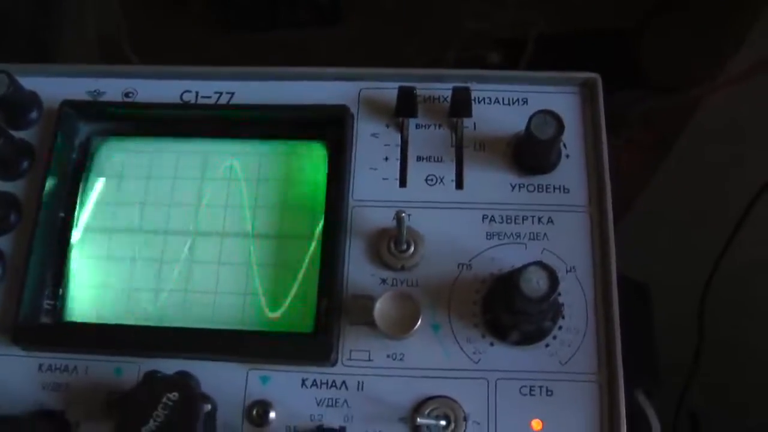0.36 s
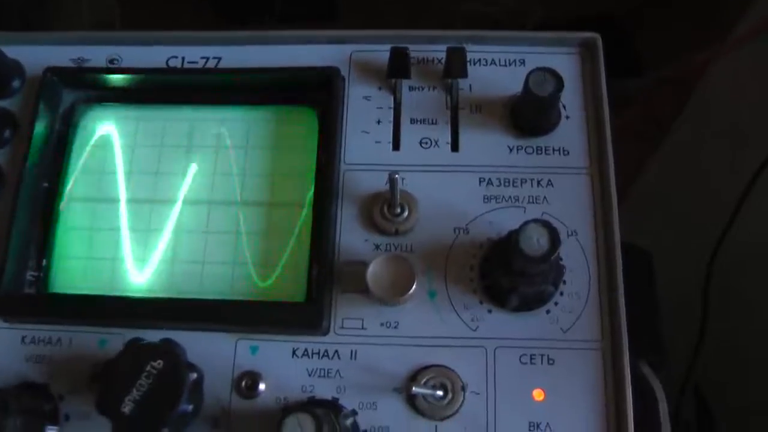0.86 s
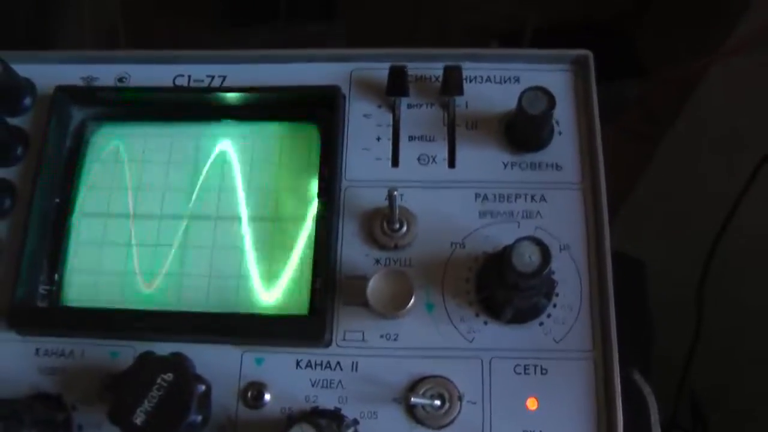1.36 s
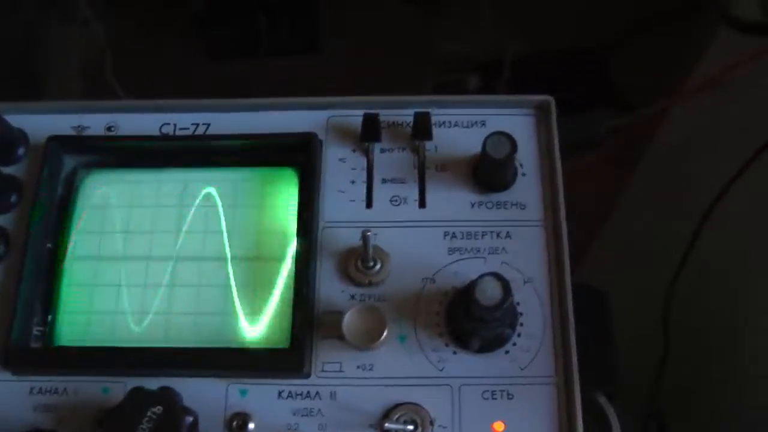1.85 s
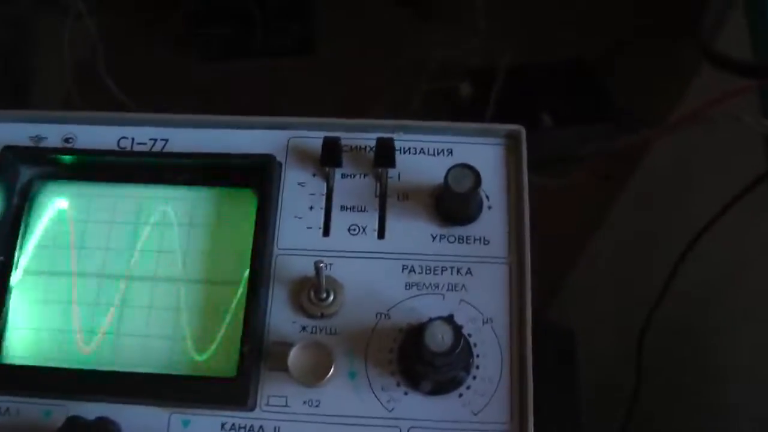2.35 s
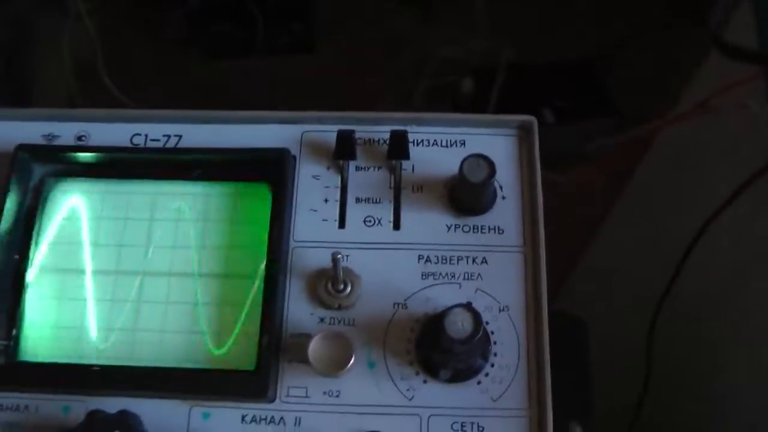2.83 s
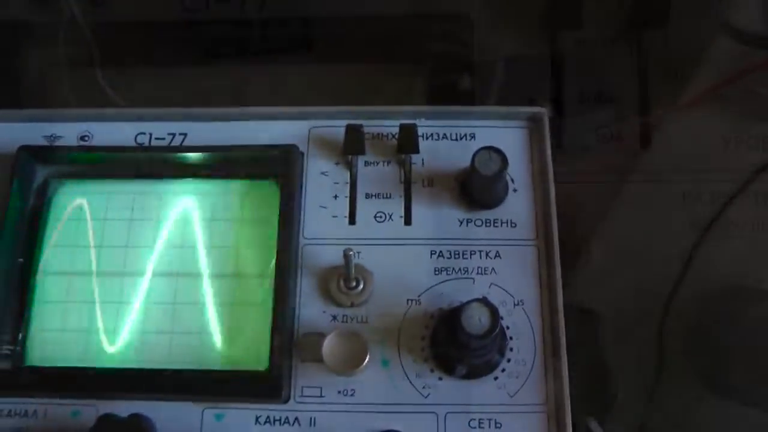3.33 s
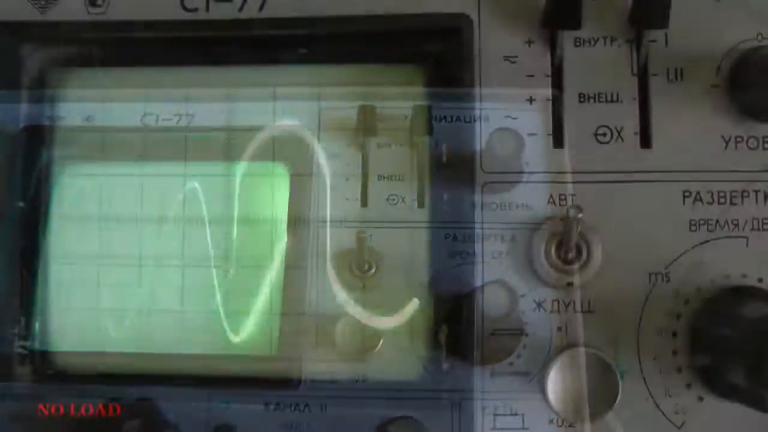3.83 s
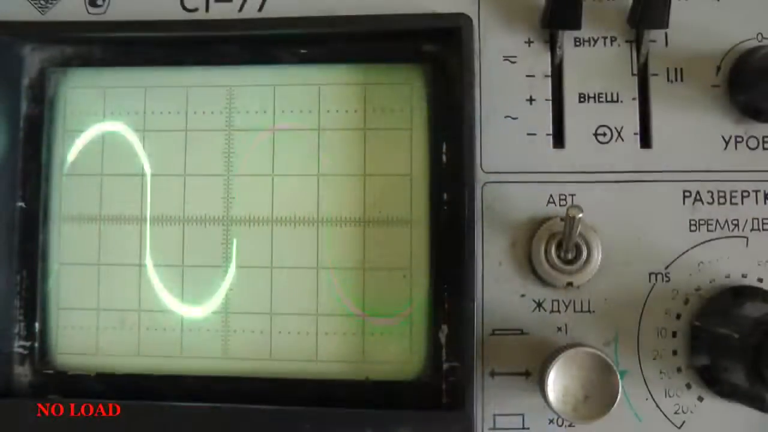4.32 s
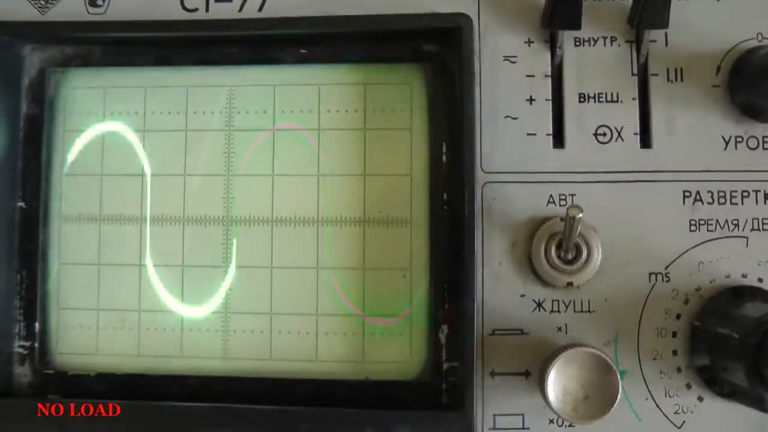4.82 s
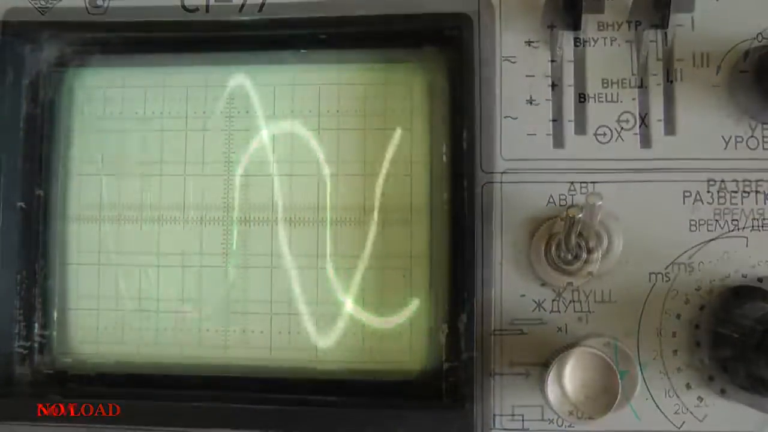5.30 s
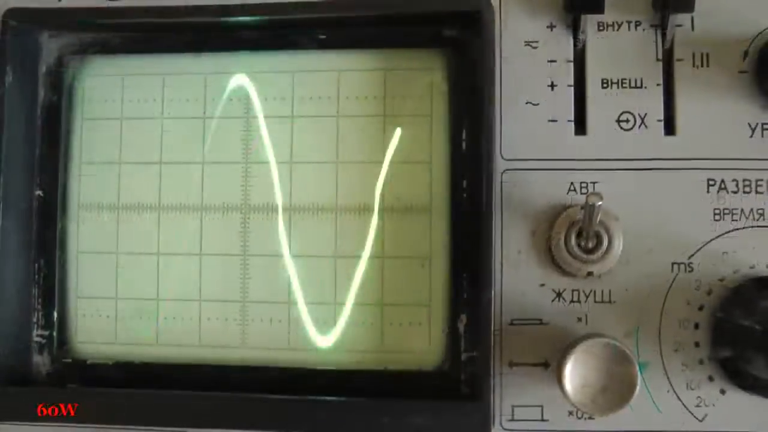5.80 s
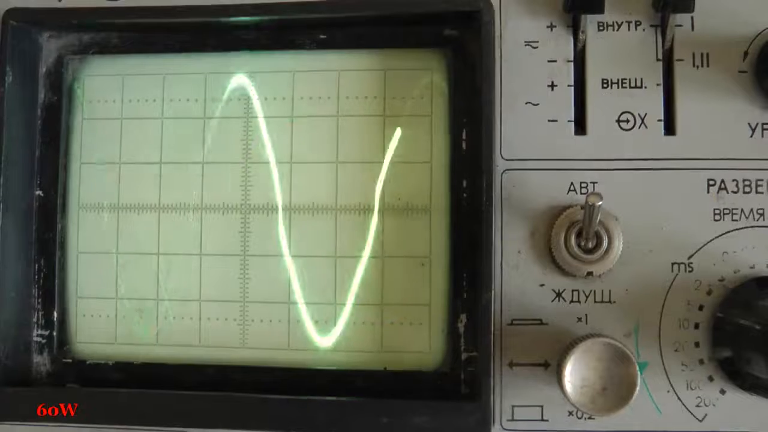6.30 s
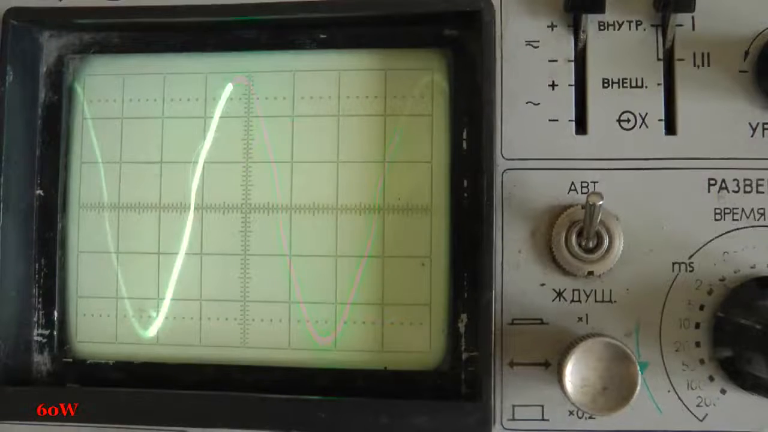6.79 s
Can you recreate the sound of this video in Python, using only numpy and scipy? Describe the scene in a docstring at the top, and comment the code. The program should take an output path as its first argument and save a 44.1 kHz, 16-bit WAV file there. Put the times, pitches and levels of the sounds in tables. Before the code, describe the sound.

From 0 seconds an electric drill motor is already whirring fast and close, a bright, rough brush hiss with bearing whines and a piercing commutator tone. With no power driving it, the pitch slides down continuously, the tones sweeping through fixed metallic housing resonances. Gain control restrains the early loudness. By 3 to 4 seconds it is a thinner, lower whirr, then a gritty scrape that stops near 4.5. The workshop's low rumble, soft hiss and faint hum come up, and a thin very high electronic whine enters around 4.1 to 4.4, later dipping briefly. At 5.3 light ticks lead into a tight, sharp double-to-triple clack at 5.43 to 5.46, with short rattle and a brief weak scrape of the rotor until about 5.8. A very faint tick at 5.8 and a clearer click at 5.93 follow. Room tone continues, with a tiny high ping just before 7.

```python
"""An electric drill whirrs down to a stop in a workshop; later a switch clacks and ticks, then a faint ping.
The motor is hiss, bearing combs, commutator whine and rotor orders gliding through fixed housing resonances.
Each switch click is a crack ringing in that housing, with a rattle that dies away in the shop.
Around it lie rumble and hiss, transformer hum, a faint tone and, late on, a thin electronic whine.
Two microphone ports hear it; gain control holds the motor down, so the room swells as the motor fades."""
import sys
import numpy as np
from scipy import signal
from scipy.fft import rfft, irfft
from scipy.io import wavfile
from scipy.ndimage import uniform_filter1d

SR = 44100
rng = np.random.default_rng(int(sys.argv[2]) if len(sys.argv) > 2 else 0)


def ratio(d):
    """dB to gain"""
    e = np.asarray(d, float) / 20
    return 10 ** e


def log_audio(samples):
    """Write samples as a 16-bit WAV file to the path given in sys.argv[1]."""
    # one column per channel
    frames = np.atleast_2d(samples).T
    # limit to full scale, then quantise
    limited = np.clip(frames, -1, 1)
    pcm = np.round(limited * 32767).astype(np.int16)
    wavfile.write(sys.argv[1], SR, pcm)


N = 315844
T = np.arange(N) / SR  # time [s]
HZ = np.fft.rfftfreq(1024, 1 / SR)  # bins of the port spectra [Hz]

# rotor: it stops at STOP_S [s]; running free it loses RUB - EASE * speed + FAN * speed ** 2
# turns per s every second: brush friction, its easing with speed, fan drag
STOP_S = 4.5
RUB, EASE, FAN = 77.136, .05495, 6.6308e-4
# the clack swings the rotor again: start [s], speed [turns/s], length [s]
JOLT_S, JOLT_SPEED, JOLT_LENGTH_S = 5.44, 18.1, 0.37

BALL_PASS = 3.495  # balls passing a race flaw per rotor turn
# bearing combs, one tooth every ball pass, and two single commutator whines near orders 24 and 48;
# each sounds at order tooth * BALL_PASS + shift:
# (shift [rotor orders], first tooth [count], last tooth [count])
MOTOR_LINES = [(0, 8, 22), (1.95, 4, 15), (1.88, 2, 6), (1.92, 1, 2), (2.0, 6, 9), (.23, 4, 9), (.8, 6, 12),
               (3.03, 6, 6), (.8, 9, 22), (.8, 13, 22), (2.4, 13, 13), (0, 14, 14), (0, 7, 7)]
# where each row of lines sounds through the housing: (level against the hiss [dB], loss per tooth [dB],
# centre [Hz], spread upward [octaves], spread downward [octaves])
LINE_VOICING = [(-10.5, .45, 6800, .07, .35), (-12.5, .2, 3200, .13, .2), (-14, -1, 1290, .13, .13),
                (-20, .5, 700, .12, .15), (-15, .1, 5500, .2, .2), (-18, .3, 3500, .2, .25),
                (-16, .1, 6800, .15, .2), (-15, .1, 5500, .2, .25), (-11, .2, 13700, .05, .06),
                (-12, .2, 10500, .08, .1), (-9.5, 0, 5600, .4, .45), (-11, 0, 5500, .35, .45),
                (-9, 0, 7000, .05, .42)]

# relative colour of the whirr, from full speed down to a crawl: (frequency [Hz], level [dB])
FAST_COLOUR = [(18, -55), (30, -31), (81, -18.5), (308, -14.5), (379, -16.5), (468, -14.5), (711, -10),
               (948, -10), (1440, -2), (2630, -6), (3890, 0), (13700, -14.5), (15600, -12)]
MIDDLING_COLOUR = [(18, -91), (30, -69), (69, -25), (208, -18), (292, -16), (730, -4.5), (876, -9.5),
                   (1440, -9), (2250, -13.5), (3080, -7.5), (6230, -8), (13700, -13), (15600, -16)]
SLOW_COLOUR = [(240, -24), (400, -23.5), (727, -23), (1120, -24), (1300, -21.5), (2190, -15), (3120, -5),
               (3690, -12), (6910, -11.5), (8180, -19), (13800, -23), (15600, -29)]
CRAWL_COLOUR = [(290, -39), (500, -18), (629, -33), (727, -0.5), (955, -11.5), (1350, -3.5), (2170, -12),
                (3200, -1.5), (3690, -11), (9970, -27.5), (15600, -39)]
# rotor speeds of the four colours, crawl first: (speed [turns/s])
COLOUR_SPEEDS = [20, 65, 210, 390]
# resonances of the drill housing: (frequency [Hz], width [Hz], lift [dB])
HOUSING_RESONANCES = [(397, 12, 10), (586.5, 35, 11), (738, 23.6, 11), (1086.6, 23.5, 10), (1257, 54, 4),
                      (1398, 40, 11), (1640, 15, -0.5), (1850, 90, 4.5), (2736, 59, 2), (2843, 24, 7),
                      (3050, 29, 8), (3169, 54, 7.5), (3570, 26, 4.5), (3963, 51, 7.5), (4600, 24, 3.5),
                      (4250, 27, 5), (4810, 53, 3.5), (6030, 86, 4.5), (6890, 86, 4.5), (10770, 1600, 3.5),
                      (13600, 400, 8.5)]
# near the stop the brush hiss outlasts the scrape: up to this many dB per octave above this pitch
LINGER_DB, LINGER_HZ = 13, 3500

# fan and brush roar: level [dB] at FULL_SPEED [turns/s], and loss [dB] for each tenfold drop in speed
FULL_SPEED, ROAR_DB, ROAR_DB_PER_DECADE = 457, -0.1, 49.5
# gear scrape about SCRAPE_SPEED [turns/s], with its fall above and below [dB per tenfold]
SCRAPE_DB, SCRAPE_SPEED, SCRAPE_FAST_DB, SCRAPE_SLOW_DB = -23, 47.5, 6, 37.5
# rotor unbalance as the bench sounds it: (frequency [Hz], rms level [dB])
BENCH_RESPONSE = [(20, -81), (70, -58), (130, -50.5), (220, -36), (275, -29), (350, -28), (415, -16.5),
                  (460, -21.5), (550, -7.5), (700, -2.5), (920, -7.5)]
SECOND_ORDER_DB = -19  # second order against the first at the same pitch

# two microphone ports, toward the drill and for the room: a pair of lists,
# (frequency [Hz], likeness of the ports [-1..1]) and (frequency [Hz], left over right [dB])
DRILL_PORTS = [(60, -3), (130, -0.4), (290, 0.9), (640, 0.85), (1410, 0.43), (3100, 0.5), (6820, 0.84),
               (15000, -0.6)], [(60, -11.5), (180, 5.5), (550, 1.5), (1650, 3.0), (4970, 5.5), (15000, -2)]
ROOM_PORTS = [(60, 0.85), (180, 0.97), (550, 0.93), (1650, 0.49), (4970, 0.85), (15000, 0.49)], [(60, -1),
              (380, -0.5), (2380, -1.5), (15000, 1)]

# relative colour of the room's rumble and hiss: (frequency [Hz], level [dB])
ROOM_COLOUR = [(15, -83), (25, -29), (57, -15), (86, -25), (108, -8), (227, 2.5), (359, -6), (483, -13.5),
               (568, -10), (900, -23), (1310, -25), (1760, -21.5), (6760, -36.5), (9090, -37.5),
               (9850, -34), (10700, -39), (15600, -38)]
ROOM_DB = -49  # rms of rumble and hiss
# transformer hum: (frequency [Hz], rms level [dB])
MAINS_HUM = (100, -60.5)
# faint steady tone: (frequency [Hz], rms level [dB])
FAINT_TONE = (840, -75)
# thin electronic whine: pitch, rms level between dips, and when and how fast it comes in
WHINE_HZ, WHINE_DB, WHINE_ON_S, WHINE_RISE_S = 9685, -59.5, 4.1, .3
# brief dips of the whine: (time [s], depth [dB], half-width [s])
WHINE_DIPS = [(5.23, 4, .15), (5.66, 10, 0.14), (6.09, 0.5, 0.13), (6.34, 9, .03), (6.68, 7, .025),
              (6.98, 14, .025)]

# switch clicks: (time [s], level [dB], ring t60 [s], rattle against the crack [dB], contact ring [Hz])
SWITCH_CLICKS = [(5.3166, -39.5, 0.037, -15, 1950), (5.3986, -50, 0.04, -3.5, 2540),
                 (5.4181, -42.5, 0.031, 4, 4300), (5.4338, -21.5, 0.016, -18, 2850),
                 (5.4444, -22, 0.054, -15, 4550), (5.4555, -26, 0.046, -13, 2500),
                 (5.79, -59.5, 0.044, 4.5, 2400), (5.9297, -34, 0.024, -17.5, 2100)]
# relative colour of a click: (frequency [Hz], level [dB])
CLICK_COLOUR = [(180, -61), (300, -37), (404, 6.5), (535, -15), (720, 11), (1000, -14), (3080, -0.5),
                (9330, -7.5), (14100, -13), (15600, -28)]
# how long the shop holds a rattle: (frequency [Hz], t60 [s])
SHOP_DECAY = [(400, 1.3), (750, 0.74), (1500, 0.71), (3000, 0.46), (6000, 0.69), (12000, 0.62)]
CLICK_PAN_DB = 2  # left over right
LIGHT_TILT_DB, HEAVY_TILT_DB = -3, 2.3  # treble tilt per octave: light ticks are duller

# faint small ping: (time [s], frequency [Hz], level before its soft onset [dB], t60 [s])
SMALL_PING = (6.985, 4380, -58, .2)


def evened(x):
    """Scales to rms 1."""
    return x / np.sqrt(np.mean(x ** 2) + 1e-20)


def read(points, hz):
    """Reads a spectrum on a log-frequency axis."""
    f, value = np.transpose(points)
    return np.interp(np.log(hz + 1), np.log(f + 1), value)


def drift(rate_hz, count):
    """Random curves of about rms 1, straight between rate_hz knots a second."""
    knots = rng.standard_normal((count, int(N / SR * 60) + 2))
    place = T * np.clip(rate_hz, .1, 59)
    curves = np.array([np.interp(place, np.arange(len(k)), k) for k in knots])
    return curves * 1.2  # makes up what the straight lines lose


def housing_db(hz):
    """Bell-shaped lifts at the fixed resonances of the housing."""
    return sum(db / (1 + (2 * (hz - f) / width) ** 2) for f, width, db in HOUSING_RESONANCES)


def ports(direct, stray, gain, pair):
    """Colours a sound by gain (bins x frames) and spreads it over two ports that share part of it."""
    like, lean_db = (read(points, HZ)[:, None] for points in pair)
    like = np.clip(like, -1, 1)
    shared, own = (signal.stft(x, nperseg=1024, noverlap=768)[2] * gain for x in (direct, stray))
    left = shared * ratio(lean_db / 2)
    right = (like * shared + np.sqrt(1 - like ** 2) * own) / ratio(lean_db / 2)
    return signal.istft(np.array([left, right]), nperseg=1024, noverlap=768)[1][:, :N]


def rotor_speed():
    """Turns per second: the drag law solved backwards from the stop, then a short swing that holds and dies."""
    root = np.sqrt(4 * RUB * FAN - EASE ** 2)
    phase = root / 2 * (STOP_S - T) - np.arctan(EASE / root)
    coast = np.maximum(root * np.tan(phase) + EASE, 0) / (2 * FAN)
    swing = JOLT_SPEED * np.maximum(1 - ((T - JOLT_S) / JOLT_LENGTH_S) ** 2, 0)
    return coast + (T > JOLT_S) * swing


def bearing_and_commutator(speed, angle):
    """Comb teeth and commutator whines sing as they glide through their bands; a quarter-turn twin is port 2's."""
    lines = np.zeros(N, complex)
    # balls slip a little, blurring the high teeth; the whines share this blur
    angle = angle + .036 * drift(rate_hz=55.0, count=1)[0]
    for (shift, first, last), (db, loss_db, centre_hz, up, down) in zip(MOTOR_LINES, LINE_VOICING):
        waver = drift(rate_hz=25.0, count=3)
        for k in range(first, last + 1):
            order = k * BALL_PASS + shift
            on = abs(np.log2((order * speed + 1) / centre_hz)) < 1  # within an octave of the centre
            octaves = np.log2(order * speed[on] / centre_hz)
            bell_db = -4.3 * (octaves / np.where(octaves > 0, up, down)) ** 2
            size = ratio(db - loss_db * (k - first) + 2.5 * waver[k % 3, on] + bell_db)
            lines[on] += size * np.exp(1j * (order * angle[on] + 2 * np.pi * rng.random()))
    return np.array([lines.real, lines.imag])


def whirr_gain(speed):
    """Housing resonances stay put while the colour between them follows the rotor speed."""
    pace = np.r_[speed[::256], 0, 0][:-(-N // 256) + 1]  # one speed per spectrum frame
    shares = [np.interp(pace, COLOUR_SPEEDS, one) for one in np.eye(4)]
    colours = (CRAWL_COLOUR, SLOW_COLOUR, MIDDLING_COLOUR, FAST_COLOUR)
    colour_db = sum(read(c, HZ)[:, None] * share for c, share in zip(colours, shares))
    gain = ratio(colour_db + housing_db(HZ)[:, None])
    gain /= np.sqrt((gain ** 2).mean(0))
    octaves_above = np.log2(np.maximum(HZ / LINGER_HZ, 1))[:, None]
    nearness_to_stop = np.maximum(1 - pace / COLOUR_SPEEDS[0], 0)
    return gain * ratio(LINGER_DB * octaves_above * nearness_to_stop)


def loudness(speed):
    """Roar that sinks with speed plus the scrape that is left at a crawl."""
    fast, slow = (np.log10((speed + .5) / mark) for mark in (FULL_SPEED, SCRAPE_SPEED))
    scrape = ratio(SCRAPE_DB) / np.hypot(ratio(SCRAPE_FAST_DB * slow), ratio(-SCRAPE_SLOW_DB * slow))
    return np.hypot(ratio(ROAR_DB + ROAR_DB_PER_DECADE * fast), scrape)


def motor():
    """Brush and fan hiss, bearing combs and commutator whine drive the housing; low rotor orders are sines."""
    speed = rotor_speed()
    angle = 2 * np.pi * np.cumsum(speed) / SR
    # the hiss throbs with each turn and each ball, and flutters at random
    throb = 1 + 0.069 * np.cos(angle) + 0.15 * np.cos(BALL_PASS * angle)
    flutter = ratio(0.53 * drift(rate_hz=40.0, count=1))
    hiss = rng.standard_normal((2, N)) * throb * flutter
    direct, stray = hiss + bearing_and_commutator(speed, angle)
    whirr = ports(direct, stray, whirr_gain(speed), DRILL_PORTS) * loudness(speed)
    shake = drift(rate_hz=30.0, count=2)
    for k, db in enumerate((0, SECOND_ORDER_DB)):
        hz = (k + 1) * speed
        # the likeness of the ports at this pitch sets how far out of step they hear it
        lag = np.arccos(np.clip(read(DRILL_PORTS[0], hz), -1, 1)) * np.array([[.5], [-.5]])
        size = ratio(read(BENCH_RESPONSE, hz) + db + 3 + 3.0 * shake[k])  # the plain 3 dB: rms to peak
        whirr += size * np.cos((k + 1) * angle + lag)
    return whirr


def room():
    """Shaped noise gives low rumble and hiss; steady sines give mains hum, a thin whine and a faint tone."""
    swell = ratio(0.32 * drift(rate_hz=4.7, count=1))
    noise = rng.standard_normal((2, N)) * swell
    air = ports(*noise, ratio(read(ROOM_COLOUR, HZ))[:, None], ROOM_PORTS)
    hum_hz, hum_db = MAINS_HUM
    hum = ratio(hum_db + 1.1 * drift(rate_hz=5.0, count=1)) * np.cos(2 * np.pi * hum_hz * T)
    dips_db = sum(db * np.exp(-((T - s) / width) ** 2) for s, db, width in WHINE_DIPS)
    rise = np.clip((T - WHINE_ON_S) / WHINE_RISE_S, 0, 1)
    port_lag = np.array([[0], [1.2]])  # radians
    whine = ratio(WHINE_DB - dips_db) * rise * np.cos(2 * np.pi * WHINE_HZ * T - port_lag)
    tone_hz, tone_db = FAINT_TONE
    tone = ratio(tone_db) * np.cos(2 * np.pi * tone_hz * T)
    return ratio(ROOM_DB) * evened(air) + np.sqrt(2) * (hum + whine + tone)  # root 2: rms to peak


def causal(colour_db):
    """Minimum-phase filter response of rms 1 that rings after the blow, never before."""
    whole = np.log(ratio(np.r_[colour_db, colour_db[-2:0:-1]]) + 1e-5)
    response = np.exp(whole - 1j * signal.hilbert(whole).imag)[:len(colour_db)]
    return response / np.sqrt(np.mean(abs(response) ** 2))


def switch():
    """Each click is a crack ringing in the housing; loose parts rattle and die away in the shop."""
    out, t = np.zeros((2, N + SR)), np.arange(SR) / SR
    hz, frame_s, _ = signal.stft(t, SR, nperseg=256)  # only the axes are used
    fine_hz = np.fft.rfftfreq(SR, 1 / SR)
    click_db, body_db = read(CLICK_COLOUR, fine_hz), housing_db(fine_hz)
    scrape_db = read(CRAWL_COLOUR, fine_hz) + body_db
    shop_fade = ratio(-60 * frame_s / read(SHOP_DECAY, hz)[:, None])
    for s, db, t60, rattle_db, contact_hz in SWITCH_CLICKS:
        contact = causal(9.3 / (1 + ((fine_hz - contact_hz) / (0.18 * contact_hz)) ** 2))
        noise = rng.standard_normal((5, SR))
        noise[0, :3] = 2.1  # the first contact is one sharp blow
        ring = (noise[0] + .5 * noise[1:3]) * ratio(-60 * t / max(t60, .003))
        # reversed, the shared noise starts the tail without the blow
        z = signal.stft(noise[0, ::-1] + 0.66 * noise[3:], SR, nperseg=256)[2]
        tail = signal.istft(z * shop_fade, SR, nperseg=256)[1][:, :SR]
        rattle = ratio(rattle_db) * tail * (1 - np.exp(-t / 0.0077))
        reach = np.clip((db + 43.5) / 35, 0, 1)  # light ticks barely wake the housing
        tilt_db = LIGHT_TILT_DB + reach * (HEAVY_TILT_DB - LIGHT_TILT_DB)
        scrape = causal(reach * scrape_db + click_db * (1 - reach))
        crack = causal(click_db + reach * body_db + tilt_db * np.log2((fine_hz + 50) / 3000))
        sound = irfft(contact * (rfft(ring) * crack + rfft(rattle) * scrape), SR)
        at = round(s * SR)
        out[:, at:at + SR] += sound * ratio(db + CLICK_PAN_DB * np.array([[.5], [-.5]]))
    return out[:, :N]


def ping():
    """A soft, short high ring: one sine with a quick rise and an exponential decay."""
    s, hz, db, t60 = SMALL_PING
    t = np.maximum(T - s, 0)
    return ratio(db - 60 * t / t60) * (1 - np.exp(-t / 0.0026)) * np.sin(2 * np.pi * hz * t)


def scene():
    """Drill, switch, ping and room together at the microphone ports."""
    return motor() + switch() + ping() + room()


def low_pass(x):
    """Removes everything above the highest recorded frequency."""
    return signal.sosfilt(signal.butter(12, 15720, fs=SR, output="sos"), x)


def record(dry):
    """Gain control pulls loud sound down toward a set level and lets go slowly."""
    power_db = 10 * np.log10(abs(uniform_filter1d((dry ** 2).mean(0), 2200)) + 1e-12)
    fall = T * 7.1  # recovery, dB a second
    held_db = np.maximum.accumulate(power_db + fall) - fall
    over_db = np.maximum(held_db + 23.0, 0)  # above the set level of -23 dB
    mix = dry / ratio(0.9 * uniform_filter1d(over_db, 1500))
    return low_pass(mix)


dry = scene()
out = record(dry)
log_audio(out)
```